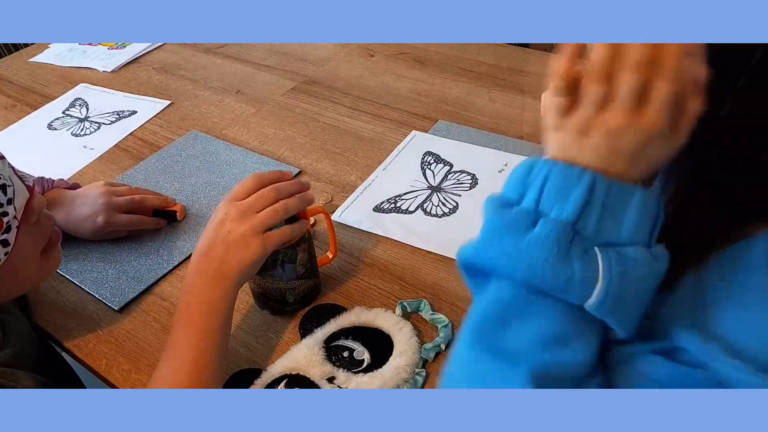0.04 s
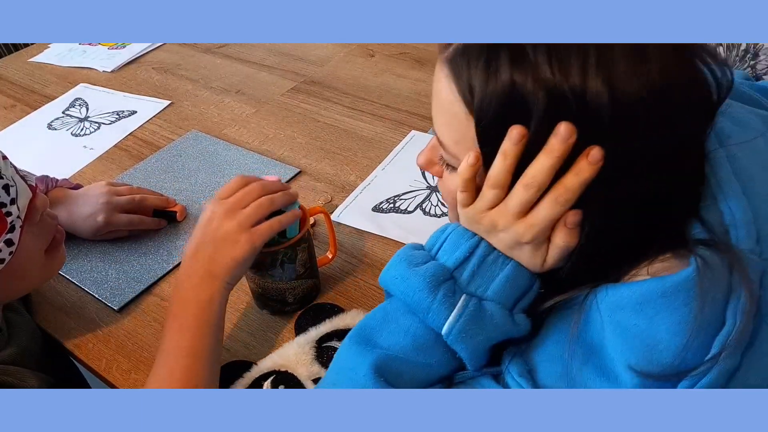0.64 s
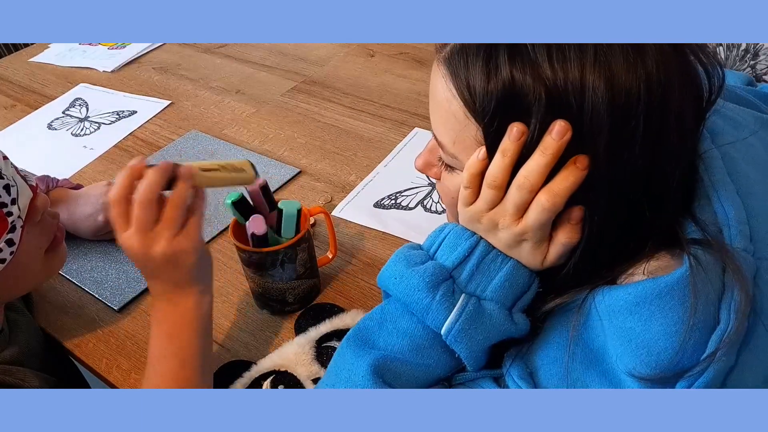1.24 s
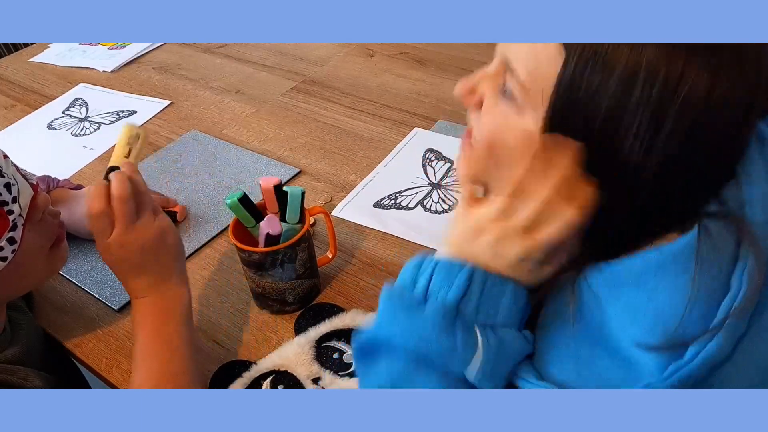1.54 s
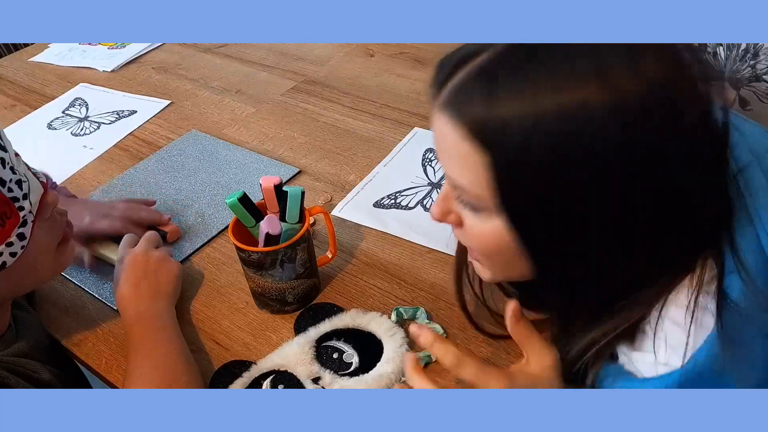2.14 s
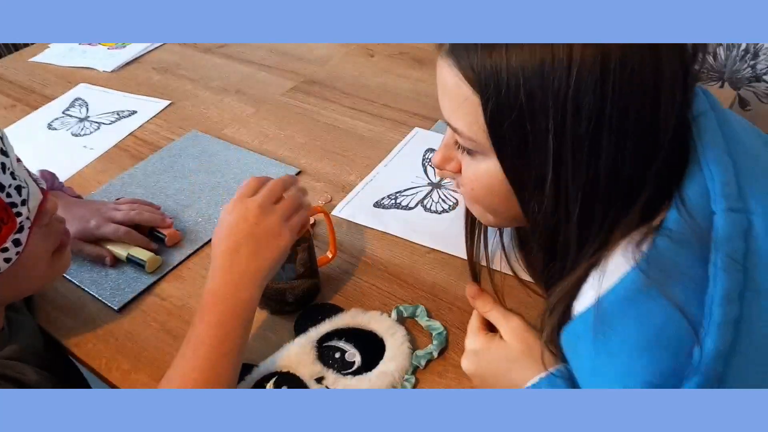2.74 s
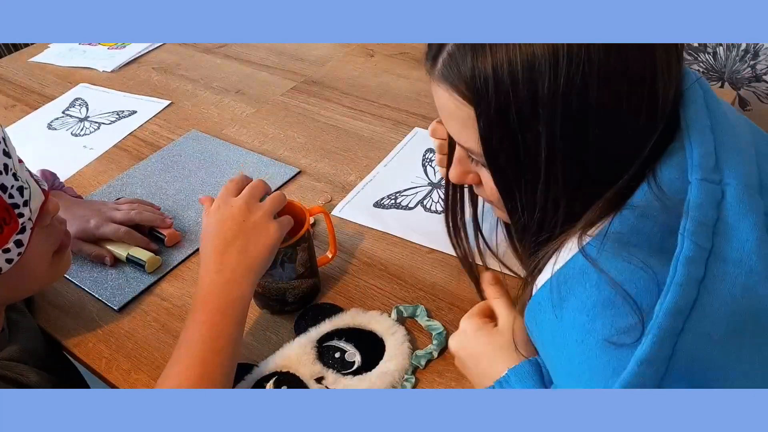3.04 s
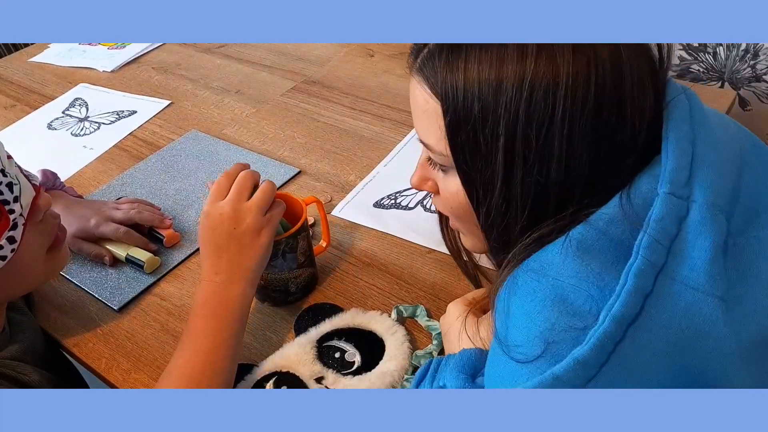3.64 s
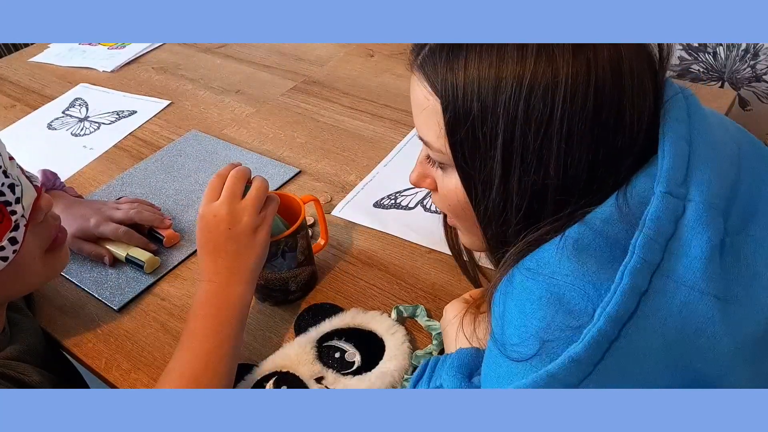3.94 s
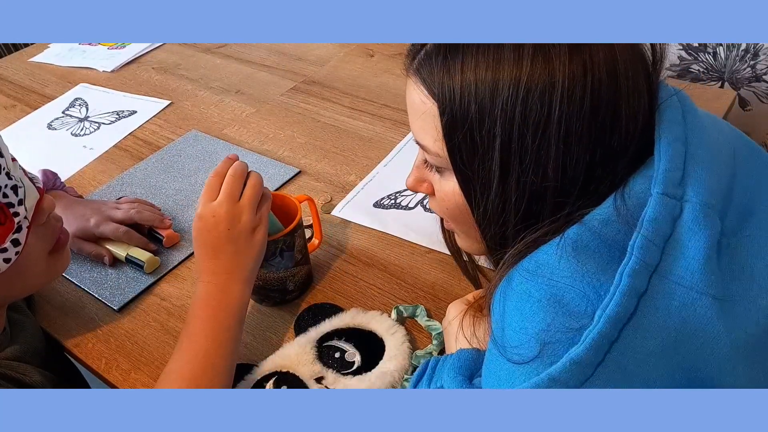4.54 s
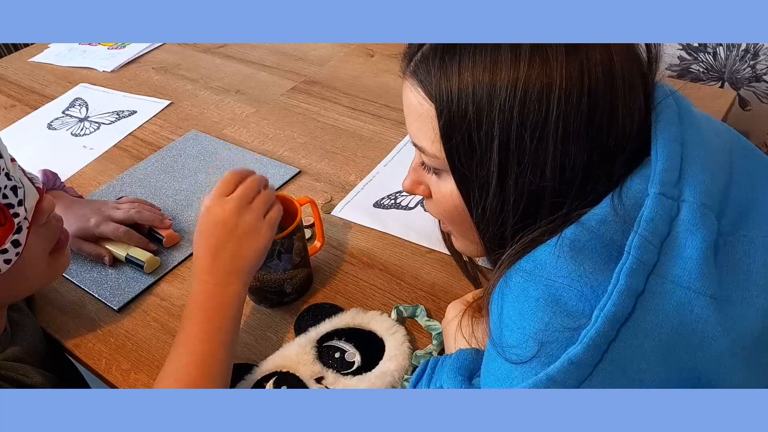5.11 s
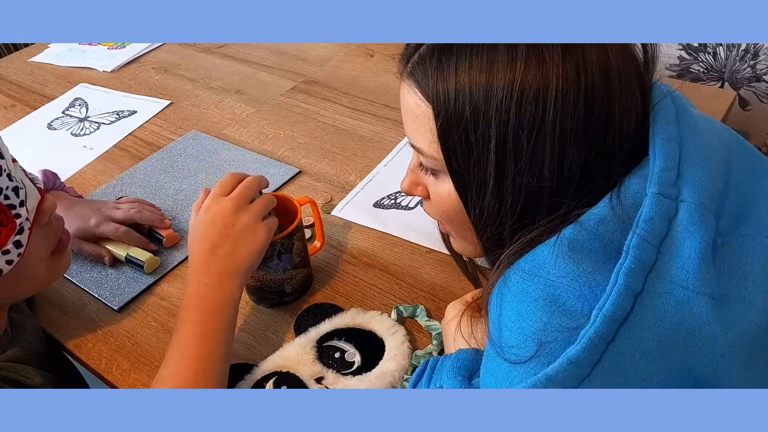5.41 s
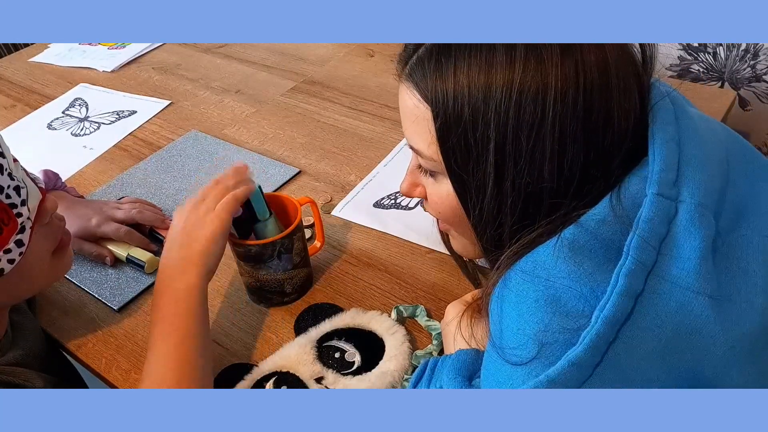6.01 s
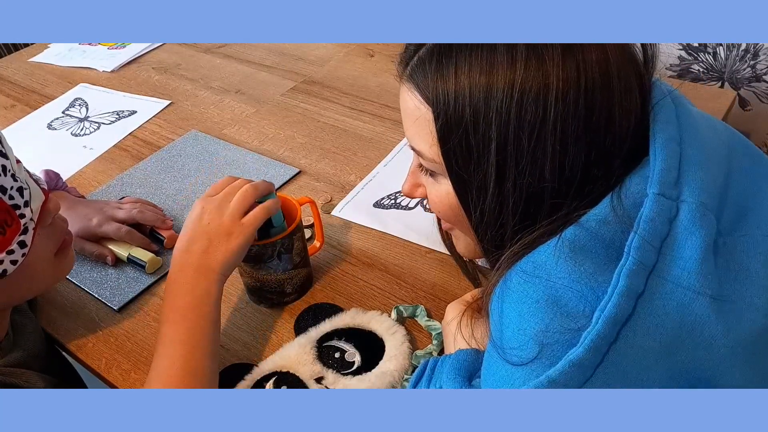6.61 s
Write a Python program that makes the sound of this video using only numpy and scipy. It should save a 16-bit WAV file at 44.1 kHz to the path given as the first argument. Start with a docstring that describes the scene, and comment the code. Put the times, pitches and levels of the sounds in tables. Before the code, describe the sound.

A hand sorts felt-tip markers in a plastic mug on a wooden table, close to the microphone in a small, live room with faint rumble and hiss. It opens with soft, dull bumps, light plastic clicks and rustling, and a faint zip of sliding barrels near 1 second. Another bump comes at about 1.7 seconds, a cluster of hollow taps around 2.5, and a sharper click at 3.7. At about 4.3 and 4.9 seconds come the loudest sounds: a marker drops to the bottom of the mug each time, knocking hollowly, thudding through the table and bouncing quickly to rest. After a quieter second, clicks and rattles resume around 6 seconds, ending with a short rising zip and a firm tap near 6.7. The sound is a little duller on the left side.

```python
"""Light plastic clicks over faint room tone: a hand sorts felt-tip markers in a plastic mug.
The mug stands on a wooden table in a small, live room, close to a stereo microphone with a dull left side.
Each contact rings the air in the mug and shakes the table; arms bump and sleeves rustle.
Barrels slide along each other with a rising zip, and twice a marker drops to the bottom and bounces."""
import sys
import numpy as np
from scipy import signal
from scipy.fft import rfft, irfft, next_fast_len
from scipy.io import wavfile
from scipy.ndimage import map_coordinates

SR = 44100
rng = np.random.default_rng(int(sys.argv[2]) if len(sys.argv) > 2 else 0)


def to_wav(s):
    """Save 16-bit WAV."""
    ch = np.atleast_2d(s).T  # columns
    pcm = np.round(np.clip(ch, -1, 1) * 32767)  # PCM
    wavfile.write(sys.argv[1], SR, pcm.astype(np.int16))


N = 298204
RING = round(.6 * SR)  # samples in which one sound dies away


def amp(db):
    """Decibels to gain."""
    return 10 ** (np.asarray(db) / 20)


def unit(x):
    """x at rms 1."""
    return x / np.sqrt(np.mean(x ** 2) + 1e-20)


def blow(x):
    """x with the energy of ten milliseconds at rms 1."""
    return unit(x) * np.sqrt(.01 * SR / x.shape[-1])


def along(points, hz):
    """A curve of (Hz, value) points, read on a log frequency axis."""
    f, values = np.transpose(points)
    return np.interp(np.log(hz + 1), np.log(f + 1), values)


def filtered(x, response):
    """x through a complex frequency response."""
    n = x.shape[-1]
    padded = next_fast_len(n + 4096)
    return irfft(rfft(x, padded) * response(np.fft.rfftfreq(padded, 1 / SR)), padded)[..., :n]


def low_cut(x, hz):
    """A two-pole high-pass."""
    return filtered(x, lambda f: (1j * f / (hz + 1j * f)) ** 2)


def resonance(f, hz, width):
    """Response of one damped mode."""
    return 1j * f * width / (hz * hz - f * f + 1j * f * width)


def fade(t, t60):
    """A decay of 60 dB in t60 seconds."""
    return np.exp(-np.log(1000) * t / t60)


def ring(modes, t, scatter, vary_db):
    """Damped modes, struck at random strengths and slightly detuned together."""
    tune = 1 + scatter * rng.standard_normal()
    return sum(amp(db + vary_db * rng.standard_normal()) * fade(t, t60) * np.sin(2 * np.pi * hz * tune * t)
               for hz, db, t60 in modes)


def add(track, start_s, x):
    """Mix x into the track from start_s."""
    part = track[..., max(round(start_s * SR), 0):][..., :x.shape[-1]]
    part += x[..., :part.shape[-1]]


# Likeness of the room's sound on the two sides of the microphone: frequency_hz, correlation
COHERENCE = [(120, 0.77), (300, 0.75), (800, 0.34), (1500, 0.033), (2500, 0.061)]
def diffuse(n):
    """Stereo noise from all directions: alike in the bass, unrelated in the treble."""
    def mid_side(f):
        angle = np.arccos(np.clip(along(COHERENCE, f), -1, 1)) / 2
        return np.array([np.cos(angle), np.sin(angle)])
    mid, side = filtered(rng.standard_normal((2, n)), mid_side)
    return np.array([mid + side, mid - side])


# The still room, all around the microphone: frequency_hz, gain_db
ROOM_TONE = [(20, -34.5), (38, -30.5), (62, 1.5), (130, 1), (300, -1.5), (800, -10.5), (2000, -15.5),
             (8000, -19), (9500, -28), (15500, -28)]
def room_tone(level_db=-66):
    """Faint rumble and hiss throughout."""
    return amp(level_db) * unit(filtered(diffuse(N), lambda f: amp(along(ROOM_TONE, f))))


def direct(x, lag_s=.0001):
    """The mug is a little nearer the right side of the microphone, so the left hears it later."""
    return filtered(x, lambda f: np.array([np.exp(-2j * np.pi * f * lag_s), np.ones_like(f)]))


# Reverberation of the small room: frequency_hz, t60_s
ROOM_DECAY = [(150, 0.69), (800, 0.29), (2500, 0.36), (7000, 0.32), (15000, 0.32)]
def room(x, build_s=0.0068):
    """The diffuse answer of the room, as strong as x itself."""
    hz, t, spectrum = signal.stft(diffuse(RING), SR, nperseg=256)
    tail = signal.istft(spectrum * fade(t, along(ROOM_DECAY, hz)[:, None]), SR, nperseg=256)[1]
    tail *= 1 - np.exp(-(np.arange(tail.shape[1]) / SR / build_s) ** 2)
    reverb = signal.fftconvolve(x[None], tail, axes=1)[:, :len(x)]
    return unit(reverb) * np.sqrt(np.mean(x ** 2))


# A plastic barrel struck close by: frequency_hz, gain_db
CLICK_SPECTRUM = [(400, -16), (900, -6), (1300, -5), (1700, -4), (2400, -1.5), (3000, -3), (4200, -3.5),
                  (5100, -2), (7800, -1.5), (8800, -13), (15500, -12.5)]
def plastic_click(t, tilt):
    """The minimum-phase click of a hollow barrel, brightened by tilt dB an octave above 1 kHz."""
    f = np.fft.rfftfreq(2 * len(t), 1 / SR)
    octaves = np.log2(np.maximum(f / 1000, 1))
    magnitude = amp(along(CLICK_SPECTRUM, f) + tilt * octaves)
    cepstrum = irfft(np.log(magnitude))[:len(t)] * np.where(t > 0, 2, 1)
    return irfft(np.exp(rfft(cepstrum, 2 * len(t))))[:len(t)]


def barrel_clack(t, click, snap_t60=0.0086, chatter_t60=0.074, chatter_db=-17):
    """A sharp snap of many tiny clicks, then a brief chatter."""
    burst = rng.standard_normal(len(t)) * (fade(t, snap_t60) + amp(chatter_db) * fade(t, chatter_t60))
    return blow(signal.fftconvolve(burst, click)[:len(t)])


# The mug's plastic wall: pitch_hz, gain_db, t60_s
WALL_MODES = [(1332, 6, 0.07), (1433, -1, 0.16), (1950, -4.5, 0.079), (2110, -8, 0.15), (2240, 0, 0.043),
              (2473, 4, 0.076), (4120, -0.5, 0.047), (4510, -3, .06)]
def mug_wall(t):
    """The struck wall rings in close pairs of modes."""
    return blow(sum(ring(WALL_MODES, t, scatter=0.012, vary_db=9) for _ in range(2)))


# The air inside the mug: pitch_hz, gain_db, t60_s
AIR_MODES = [(746, -2, 0.027), (817, 3, 0.071), (930, -8.5, 0.03)]
def mug_air(t, swell_s=0.0014):
    """A hoot that swells over a cycle or two; hand and markers detune it a little each time."""
    return ring(AIR_MODES, t, scatter=0.032, vary_db=7) * (1 - np.exp(-t / swell_s))


# The mug's lingering hum: pitch_hz, gain_db, t60_s
HUM_MODES = [(747, -14, 0.24), (808, 10.5, 0.305), (847, -2, 0.079)]
def mug_hum(t, swell_s=0.015):
    """The mug hums on after the hoot has died."""
    return blow(ring(HUM_MODES, t, scatter=.005, vary_db=5) * (1 - np.exp(-t / swell_s)))


# The wooden top under the mug: pitch_hz, gain_db, t60_s
TABLE_MODES = [(128.2, -10, 0.34), (176, -20.5, 0.1), (213.7, 3, 0.29), (317.5, -14.5, 0.26),
               (424.8, -4, 0.24), (474.7, -9.5, 0.15), (546, -10, 0.21)]
# Dense low modes around it: frequency_hz, gain_db
DENSE_SPECTRUM = [(25, -42), (55, -16.5), (120, -2.5), (250, 0.5), (500, -4), (700, -14), (1500, -31.5),
                  (4000, -71.5)]
def table_ring(t, dense_t60=0.3, build_s=0.016, dense_db=-3.5):
    """The table top and the dense low modes of the room swell and die together."""
    dense = filtered(diffuse(len(t)), lambda f: amp(along(DENSE_SPECTRUM, f))) * fade(t, dense_t60)
    modes = ring(TABLE_MODES, t, scatter=0.002, vary_db=4.5)
    return (unit(modes) + amp(dense_db) * unit(dense)) * (1 - np.exp(-(t / build_s) ** 2))


def contact(db, air_db, feel, low_cut_hz, hum_db=-13, click_room_db=0.5, wall_room_db=4, air_room_db=-1):
    """One contact is a clack of barrels, a ring, hoot and hum of the mug and a thud of the table."""
    t = np.arange(RING) / SR
    clack_db, table_db, wall_db, tilt = feel
    click = plastic_click(t, tilt)
    clack = amp(db + clack_db) * barrel_clack(t, click)
    # the wall is loud only when a contact is both hard and against the mug
    wall = amp(min(db + clack_db, air_db) + wall_db) * mug_wall(t)
    hoot = amp(air_db) * blow(mug_air(t))
    hum = amp(air_db + hum_db) * mug_hum(t)
    thud = amp(db + table_db) * blow(low_cut(table_ring(t), low_cut_hz))
    # the room gathers the clack from all directions, which evens out its spectrum
    radiated = amp(db + click_room_db) * blow(click) + amp(wall_room_db) * wall + amp(air_room_db) * hoot
    return direct(clack + wall + hoot + hum) + room(radiated) + thud


# Feel of a contact, relative to its strength: clack_db, table_db, wall_db, tilt_db_per_octave
SOFT_FEEL, HARD_FEEL = (-11, 4.5, -14.5, -5.5), (3, -9, -13, 0.2)
# A marker taps its neighbours, the mug or the mat, close by: start_s, strength_db, air_db, hardness (0-1)
MARKER_TAPS = [(0.048, -44, -49.5, 0.32), (0.303, -52, -47, 0.28), (0.407, -45, -48.5, 0.3),
               (0.543, -37, -41, 0.3), (0.583, -38.5, -53, 0), (0.858, -47.5, -55.5, 0.35),
               (0.931, -48.5, -46, 0.5), (1.063, -43, -43, 0.3), (1.113, -54, -46.5, 0.6),
               (1.167, -42.5, -45.5, 0.43), (1.253, -42.5, -53, 0.32), (1.326, -34, -37, 0.6),
               (1.485, -48.5, -42.5, 0.52), (1.719, -28, -54, 0.14), (1.871, -37.5, -58, 0.52),
               (2.446, -29, -34.5, 0.34), (2.505, -35.5, -37.5, 0.3), (2.584, -31, -29.5, .5),
               (2.684, -30.5, -43.5, 0.47), (2.71, -35, -34, 0.45), (2.841, -48.5, -47.5, 0),
               (3.109, -46.5, -56.5, 0.42), (3.172, -38.5, -45.5, .35), (3.392, -50.5, -66, 0.5),
               (3.424, -58.5, -35.5, 0), (3.677, -26.5, -30, 0.87), (3.77, -54.5, -38, .5),
               (4.285, -48.5, -54.5, .4), (4.317, -41, -40.5, 0.26), (5.29, -55.5, -53.5, 0.2),
               (5.537, -48.5, -59, .45), (5.936, -41, -37, 0.25), (6.033, -36.5, -29.5, 0.64),
               (6.087, -31.5, -44, 0.94), (6.129, -39.5, -43, .3), (6.186, -44.5, -63, 1),
               (6.259, -33.5, -40.5, .55), (6.288, -29.5, -38.5, .3), (6.551, -50, -43, 0.6),
               (6.682, -22, -22, .65)]
def taps(low_cut_hz=123, settle_wait_s=(.007, .02), settle_db=-10.5):
    """Hard taps snap brightly; soft ones go into the table, barely moving its lowest modes."""
    out, t = np.zeros((2, N)), np.arange(RING // 4) / SR
    for start_s, db, air_db, hardness in MARKER_TAPS:
        feel = np.add(SOFT_FEEL, hardness * np.subtract(HARD_FEEL, SOFT_FEEL))
        add(out, start_s, contact(db, air_db, feel, low_cut_hz))
        # the marker ticks once more as it settles
        clack_db, _, _, tilt = feel
        tick = amp(db + clack_db + settle_db) * barrel_clack(t, plastic_click(t, tilt))
        add(out, start_s + rng.uniform(*settle_wait_s), direct(tick))
    return out


# Hands and marker ends on table, mat and mug, heard through the room: start_s, level_db, centre_hz, t60_s
SOFT_BUMPS = [(0.086, -29.5, 132, 0.31), (0.141, -31, 80, 0.38), (1.328, -39.5, 121, 0.44),
              (1.722, -30, 413, 0.5), (1.739, -32, 146, 0.28), (3.665, -31, 680, 0.19),
              (6.306, -34.5, 197, 0.32)]
def bumps(relative_width=0.93, build_s=0.0034):
    """Soft, heavy contacts give only a dull thump."""
    out, t = np.zeros((2, N)), np.arange(RING) / SR
    for start_s, db, hz, t60 in SOFT_BUMPS:
        thump = filtered(diffuse(RING), lambda f: resonance(f, hz, relative_width * hz) ** 2)
        envelope = fade(t, t60) * (1 - np.exp(-t / build_s))
        add(out, start_s, amp(db) * blow(thump * envelope))
    return out


# A scraped barrel: pitch_hz, width_hz, gain_db
BARREL_MODES = [(2067, 48, 3.5), (2440, 34, -3.5), (3007, 92, -7), (3693, 72, -6)]
def barrel_ring(slips, widen=4.1):
    """Slips ring a barrel; fingers damp it and widen its resonances."""
    response = lambda f: sum(amp(db) * resonance(f, hz, widen * width) for hz, width, db in BARREL_MODES)
    return unit(filtered(slips, response))


def ticks(per_s):
    """Impulses of random time and strength."""
    return unit((rng.random(N) < per_s / SR) * rng.standard_normal(N))


def rattle(t, per_s=45, click_db=-13):
    """Loose markers chatter in the stirred mug, each tap a small hoot and click."""
    light_tap = blow(mug_air(t)) + amp(click_db) * blow(plastic_click(t, tilt=-4))
    return unit(signal.fftconvolve(ticks(per_s), light_tap)[:N])


# The rustle of friction: frequency_hz, gain_db
FRICTION_SPECTRUM = [(40, -2), (150, 2), (400, 1.5), (1200, -4), (2200, -4), (4000, -5), (7800, -2.5),
                     (9000, -16), (15500, -19)]
# Fingers, barrels and sleeves rubbing near the microphone: peak_s, half_length_s, friction_db, air_db
RUB_STROKES = [(0.125, 0.083, -48, -53.5), (0.393, 0.11, -48, -56), (0.589, .039, -45, -41),
               (0.767, 0.087, -63, -53.5), (1.037, 0.11, -45, -47.5), (1.31, .03, -45.5, -46.5),
               (2.0, 0.13, -51, -91), (2.428, 0.019, -55.5, -52.5), (3.036, 0.17, -55, -60),
               (3.292, 0.066, -53.5, -62), (3.41, 0.056, -68, -48), (3.669, 0.011, -37.5, -41.5),
               (4.347, 0.018, -36.5, -33), (4.807, 0.073, -57.5, -53), (4.861, 0.021, -35, -35),
               (5.321, 0.029, -59.5, -54), (5.864, 0.073, -64.5, -57.5), (6.166, 0.015, -48, -39),
               (6.589, .037, -53.5, -44.5), (6.617, 0.021, -38.5, -37), (6.686, 0.036, -36.5, -29.5)]
def rubbing(slips_per_s=600, grips_per_s=70, grip_db=4, barrel_db=-6, hollow_db=-2, rattle_db=-7,
            direct_db=-5, room_db=-3):
    """Tiny slips, clumping as the grip catches, rustle and stir the mug's air while markers rattle."""
    t = np.arange(N) / SR
    catches = rng.standard_normal(int(t[-1] * grips_per_s) + 4)
    grip = amp(grip_db * map_coordinates(catches, [t * grips_per_s]))
    slips = lambda: grip * (ticks(slips_per_s) + rng.standard_normal(N))
    friction = unit(filtered(slips(), lambda f: amp(along(FRICTION_SPECTRUM, f))))
    scrape = unit(friction + amp(barrel_db) * barrel_ring(slips()))
    hollow = unit(signal.fftconvolve(slips(), mug_air(t[:RING]))[:N])
    stirred = amp(hollow_db) * hollow + amp(rattle_db) * rattle(t[:RING])
    strokes = sum(np.exp(-((t - peak_s) / half_s) ** 2) * (amp(db) * scrape + amp(air_db) * stirred)
                  for peak_s, half_s, db, air_db in RUB_STROKES)
    return amp(direct_db) * direct(strokes) + amp(room_db) * room(strokes)


# Barrels and fingers sliding at the mug: start_s, length_s, first_hz, last_hz, strength_db, roughness (0-1)
BARREL_SLIDES = [(0.94, 0.056, 3050, 4730, -37.5, 0.06), (.955, 0.051, 7900, 6850, -40, .04),
                 (0.961, 0.14, 10830, 12840, -49.5, .2), (6.605, 0.041, 4200, 8300, -21, 0.12),
                 (6.6, 0.083, 2680, 3000, -31, .12), (6.603, 0.1, 10400, 12500, -37, .17),
                 (6.635, 0.052, 8100, 7900, -29.5, 0)]
def slides(jitter_hz=1200, direct_db=-1, room_db=-2):
    """The fine grain of a barrel zips past an edge: the pitch follows the marker's uneven speed."""
    out, t = np.zeros((2, N)), np.arange(RING) / SR
    for start_s, length_s, first_hz, last_hz, db, roughness in BARREL_SLIDES:
        progress = np.clip(t / length_s, 0, 1)
        pitch = first_hz + (last_hz - first_hz) * progress
        jitter = unit(filtered(rng.standard_normal(RING), lambda f: 1 / (1 + (f / jitter_hz) ** 2)))
        phase = 2 * np.pi * np.cumsum(pitch * (1 + roughness * jitter)) / SR
        pressure = np.sqrt(np.abs(np.sin(np.pi * progress ** 2)))
        zipping = amp(db) * pressure * np.sin(phase)
        add(out, start_s, amp(direct_db) * direct(zipping) + amp(room_db) * room(zipping))
    return out


DROP_FEEL, BOUNCE_FEEL = (-2.5, 5, -1.5, -1.8), (2.5, 3.5, -10, -3)  # columns as in SOFT_FEEL
# A marker let go into the mug, close by:
# start_s, landing_db, air_db, slap_db, first_flight_s, first_bounce_db, bounce_air_db
MARKER_DROPS = [(4.345, -21, -9.5, -18.5, .0945, -21.5, -25), (4.876, -19, -15.5, -25.5, .065, -19.5, -17)]
def drops(slap_s=.015, slap_air_db=2, bounces=3, second_flight_s=.049, shrink=.47,
          loss_db=7, air_loss_db=4, low_cut_hz=30.38):
    """A dropped marker lands, tips against the wall with a slap and bounces ever faster and weaker."""
    out = np.zeros((2, N))
    for start_s, db, air_db, slap_db, flight_s, bounce_db, bounce_air_db in MARKER_DROPS:
        add(out, start_s, contact(db, air_db, DROP_FEEL, low_cut_hz))
        add(out, start_s + slap_s, contact(slap_db, slap_db + slap_air_db, DROP_FEEL, low_cut_hz))
        for k in range(bounces):
            delay_s = flight_s + second_flight_s * sum(shrink ** j for j in range(k))
            bounce = contact(bounce_db - loss_db * k, bounce_air_db - air_loss_db * k,
                             BOUNCE_FEEL, low_cut_hz)
            add(out, start_s + delay_s, bounce)
    return out


# The microphone's muffled left port, relative to the right: frequency_hz, gain_db
LEFT_RESPONSE = [(200, 1.5), (1000, 2.9), (2400, 2.5), (4400, 1), (6000, -12.5), (8000, -26),
                 (11000, -23.5), (15000, -9)]
def scene():
    """The handling reaches the two ports of the microphone, over the room tone."""
    handling = taps() + drops() + bumps() + rubbing() + slides()
    ports = lambda f: np.array([amp(along(LEFT_RESPONSE, f)), np.ones_like(f)])
    return filtered(handling, ports) + room_tone()


def record(dry, low_cut_hz=40, top_hz=15800):
    """The recorder thins the deepest bass, clips at full scale and keeps nothing above top_hz."""
    clipped = np.clip(low_cut(dry, low_cut_hz), -1, 1)
    return filtered(clipped, lambda f: f < top_hz)


dry = scene()
out = record(dry)
to_wav(out)
```